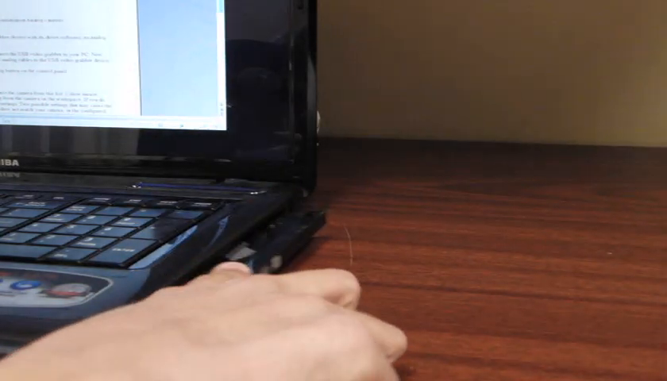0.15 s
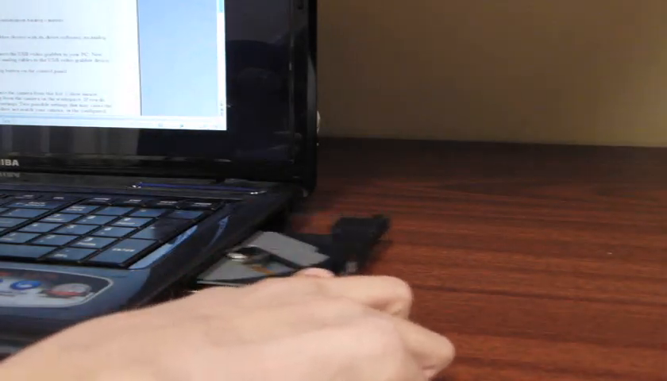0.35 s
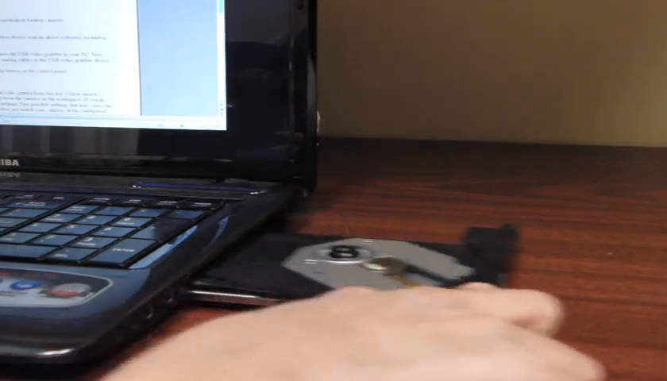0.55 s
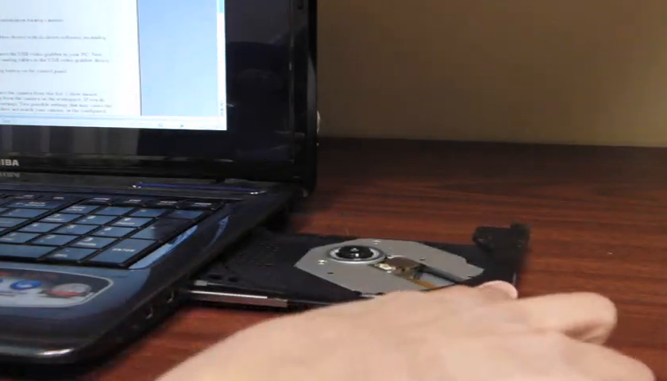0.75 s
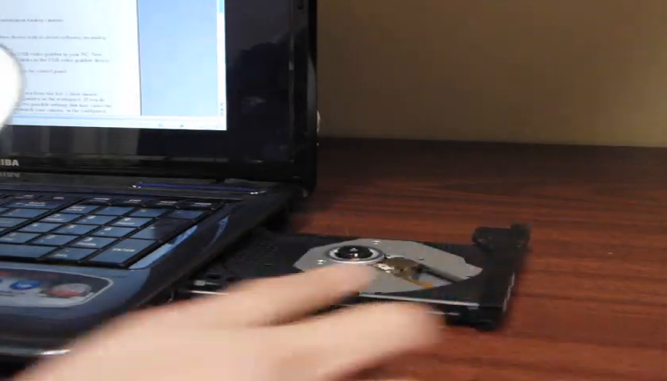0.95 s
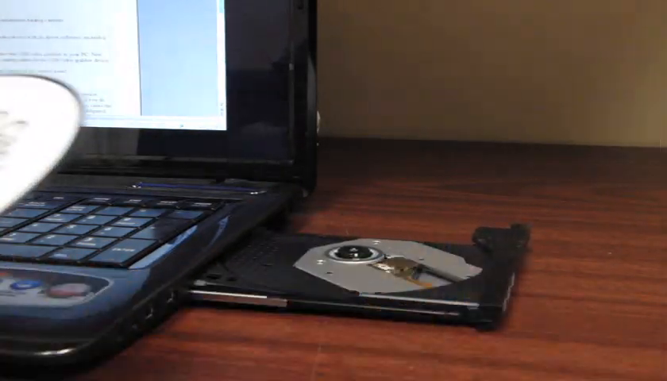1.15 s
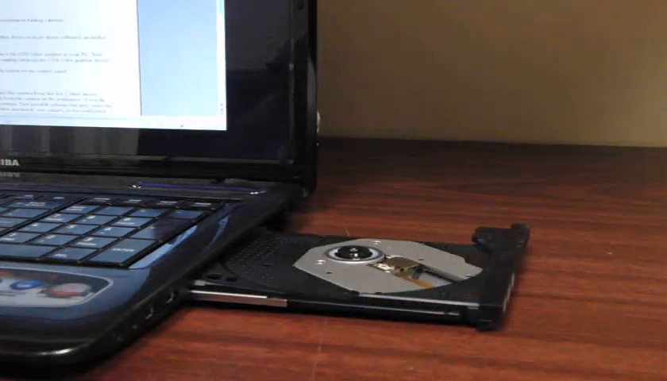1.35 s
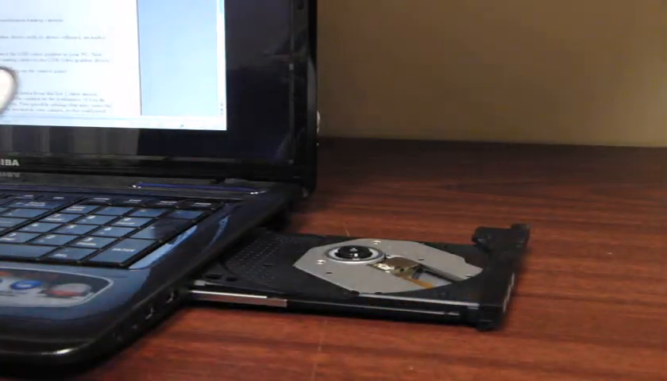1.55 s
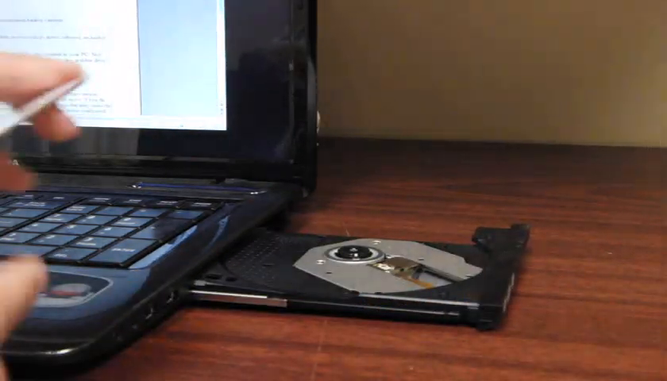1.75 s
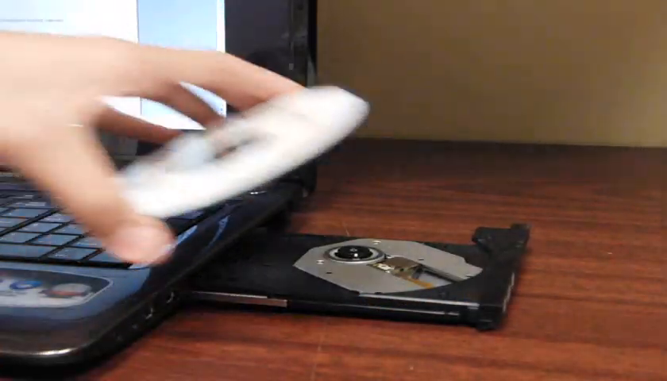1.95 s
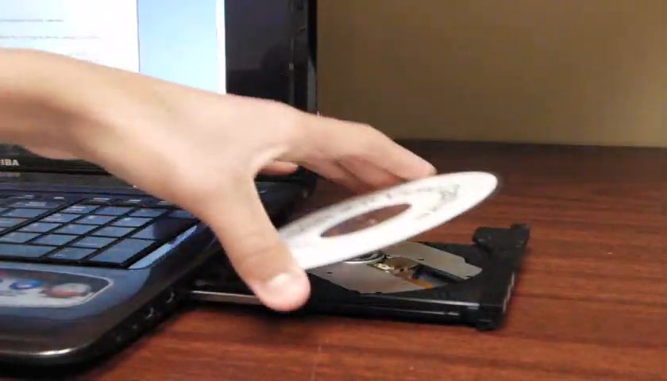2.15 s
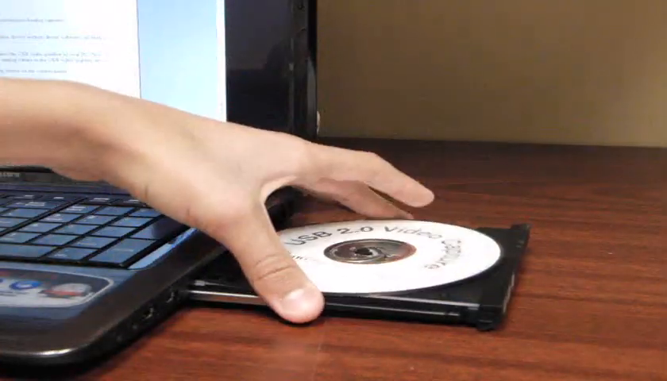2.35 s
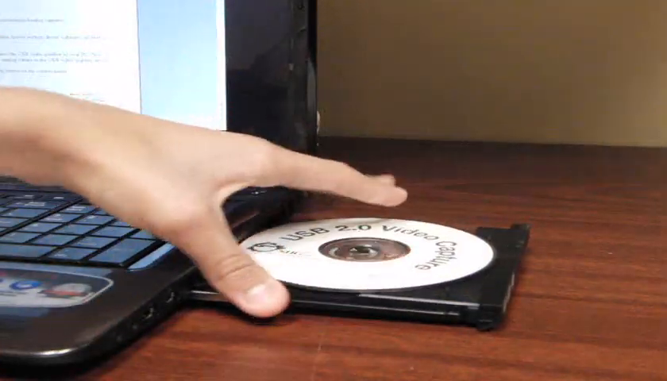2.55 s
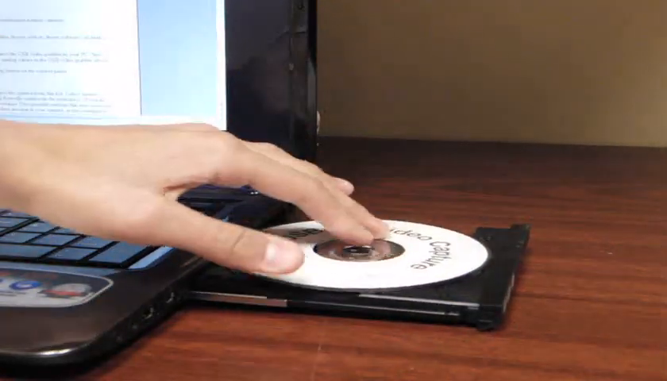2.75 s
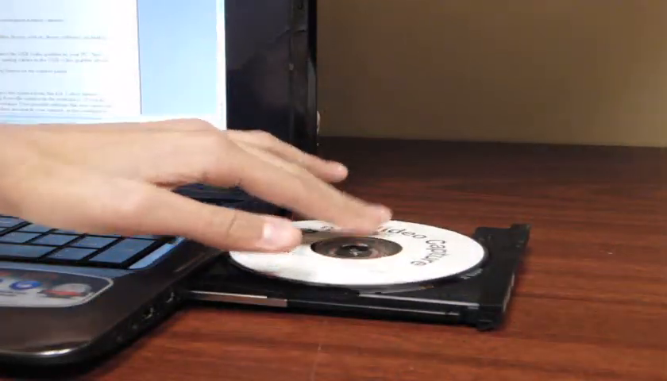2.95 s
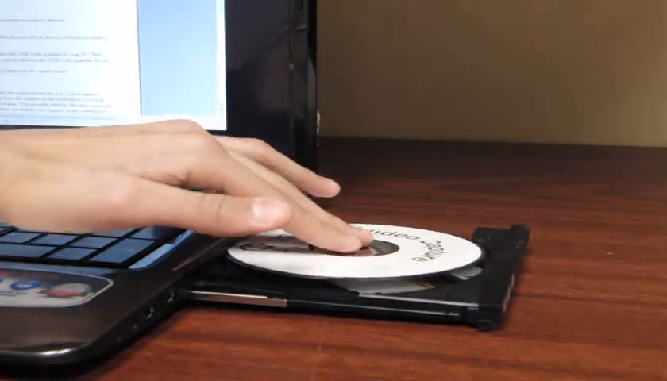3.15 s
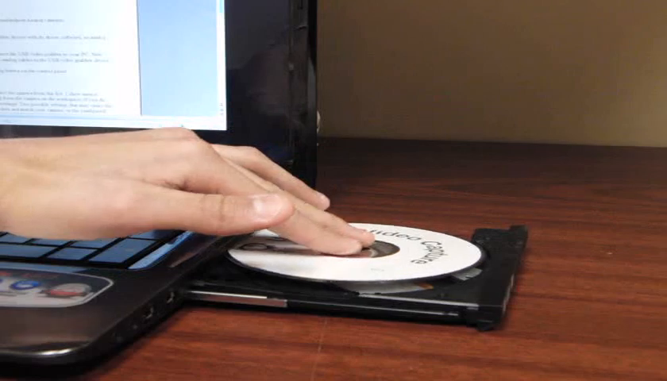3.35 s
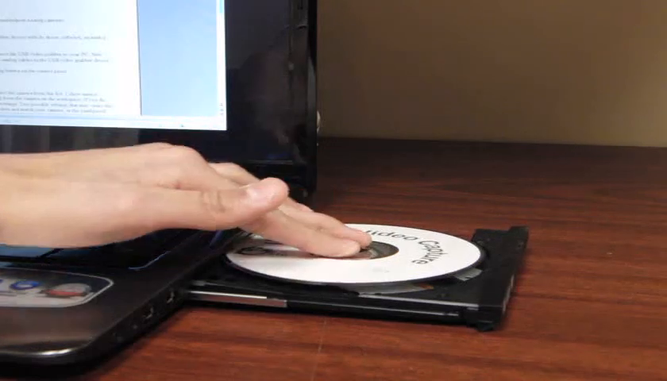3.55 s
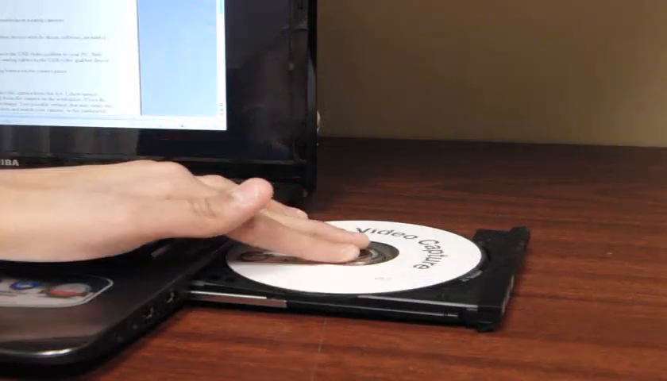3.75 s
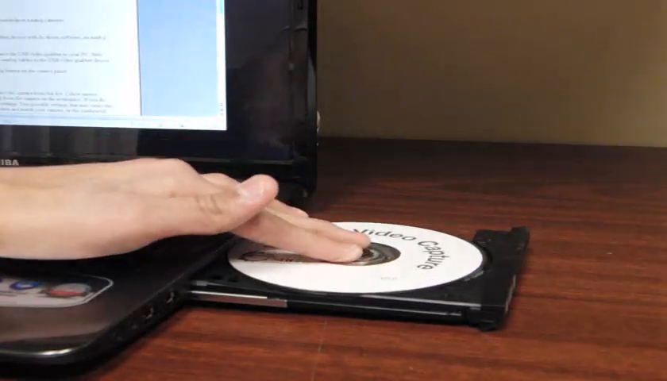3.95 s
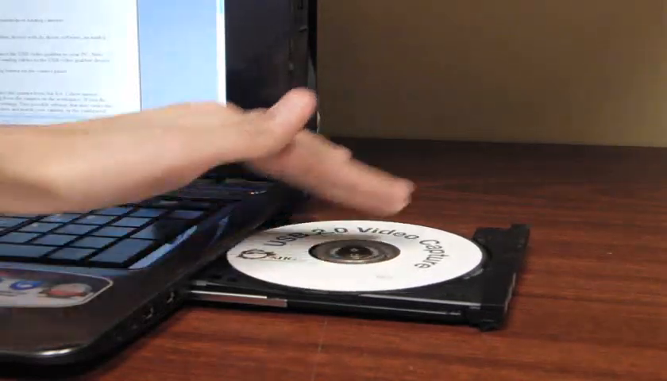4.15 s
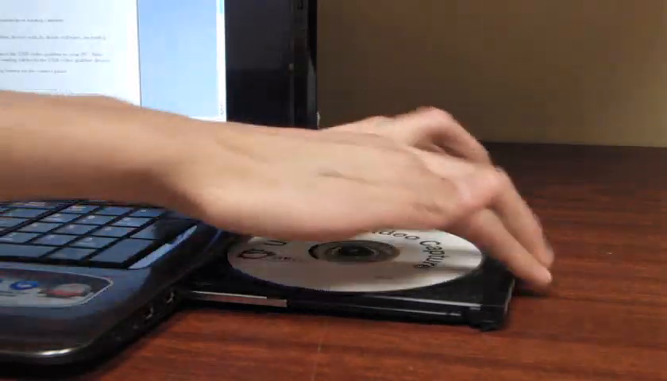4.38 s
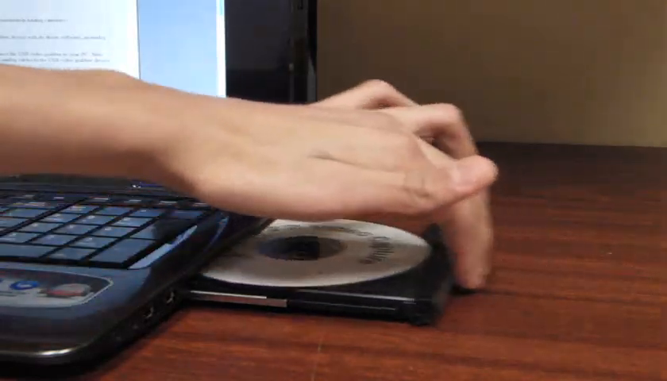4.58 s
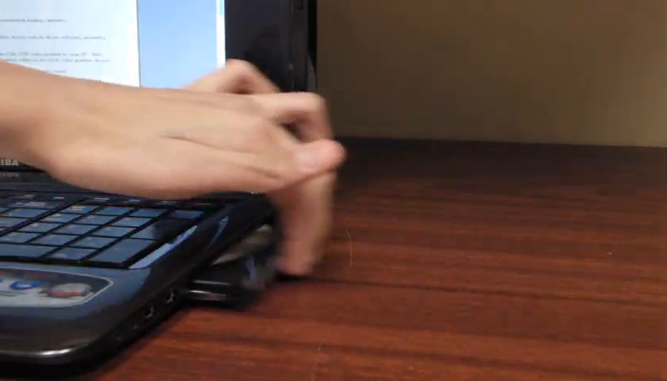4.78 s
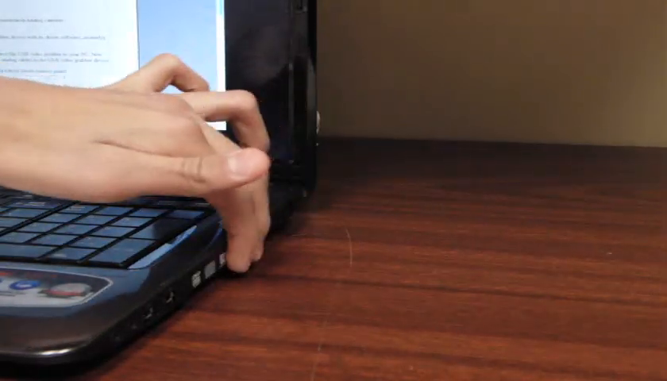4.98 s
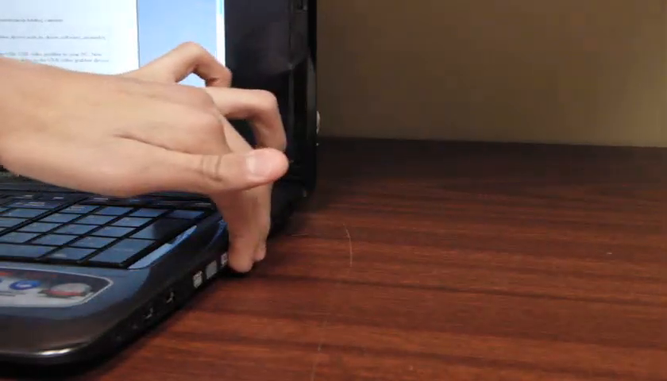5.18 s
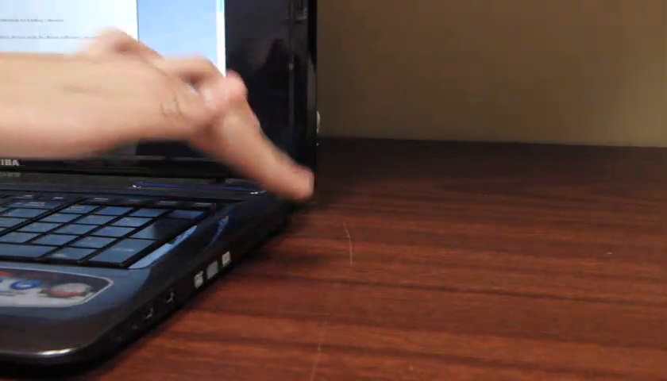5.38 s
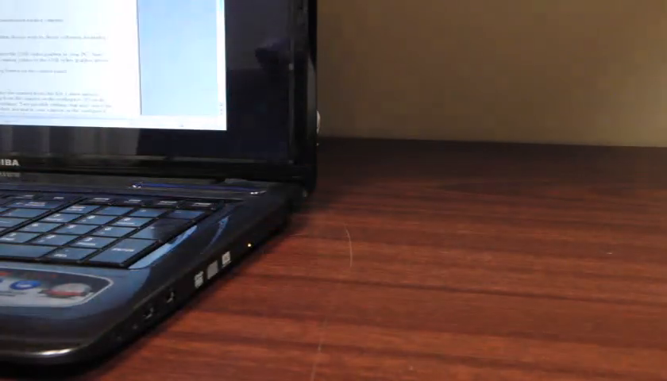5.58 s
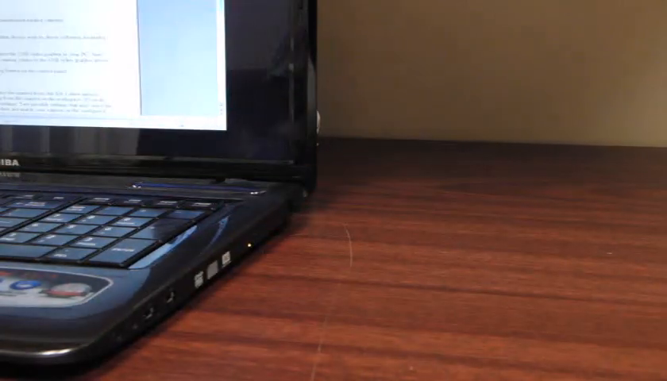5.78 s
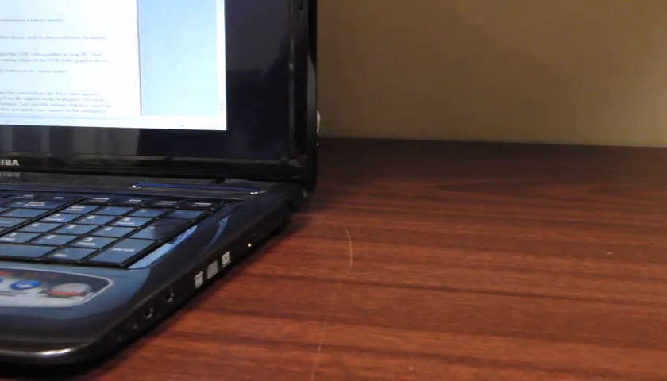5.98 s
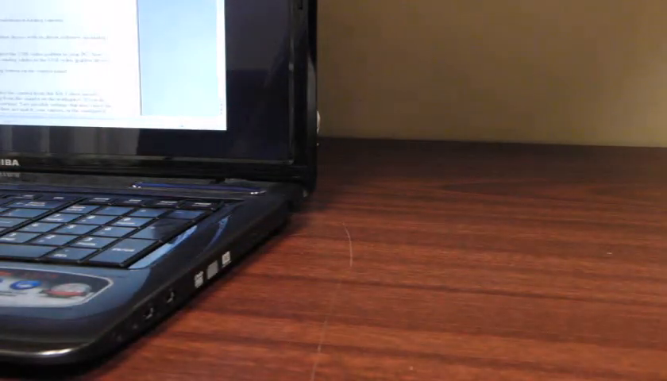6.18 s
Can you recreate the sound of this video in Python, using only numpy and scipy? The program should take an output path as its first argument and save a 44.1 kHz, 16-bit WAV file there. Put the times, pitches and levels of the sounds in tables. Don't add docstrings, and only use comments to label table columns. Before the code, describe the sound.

Close up in a small room, a laptop's thin plastic disc tray slides and clacks open. After a quiet gap of fan hiss and faint whine, a disc lands with light ticks, scrapes and rocks, then snaps sharply onto the hub. Soft hand thuds on the wooden desk follow, the tray slides in, slams and latches with crisp clicks, and a low knock ends it.

```python
import sys
import numpy as np
from scipy import signal
from scipy.fft import rfft, irfft
from scipy.io import wavfile
from scipy.ndimage import uniform_filter1d

SR = 44100
rng = np.random.default_rng(int(sys.argv[2]) if len(sys.argv) > 2 else 0)


def master_out(mix):
    frames = np.transpose(np.atleast_2d(mix))
    ceiling = np.clip(frames, -1, 1)
    pcm = np.round(ceiling * 32767).astype(np.int16)
    wavfile.write(sys.argv[1], SR, pcm)


def attenuation_scalar(level_db):
    decades = np.asarray(level_db, float) / 20
    return 10 ** decades


N = 274302

# f/Hz, density/dB
FAN_HISS = [(12, 12.5), (30, 1.5), (60, -8.5), (90, -1.5), (200, 1), (500, 1), (1000, -1), (2000, -4.5),
            (3500, -7), (5300, -11), (7000, -5.5), (8500, -9.5), (10200, -11.5), (12500, -12.5)]
# f/Hz, width/Hz, rms level/dB
WHINES = [(53, 4, -71), (876.5, 49, -70), (1240, 8, -89), (1404, 6.4, -77), (4650, 180, -70.5),
          (4780, 63, -69.5), (9620, 670, -65.5), (9800, 120, -100), (12000, 240, -74.5)]
# multiple of the pitch, rms level/dB
COIL_PARTIALS = [(1, -69), (2, -63.5)]

# t/s, peak level/dB, f/Hz, t60/s
WRIST_THUDS = [(0.222, -47, 284, 0.29), (2.661, -45, 169, 0.42), (2.719, -55, 122, 0.53),
               (3.897, -37, 225, 0.19), (3.941, -41, 235, 0.15), (3.975, -41.5, 165, 0.23),
               (4.029, -44.5, 215.4, 0.36), (4.329, -49, 532, 0.23), (4.372, -41, 289, 0.19),
               (4.398, -38.5, 252, 0.26), (4.438, -49, 175, 0.6), (4.499, -47.5, 370, 0.24),
               (4.671, -49.5, 300, 0.13), (5.12, -56, 236, 0.36)]
# t/s, peak level/dB, f/Hz, t60/s
LAST_KNOCK = [
    (5.891, -38, 803, 0.048),
    (5.892, -29.5, 500, 0.06),
    (5.906, -35.5, 351, 0.2),
    (5.997, -49.5, 360, 0.086),
]
# t/s, peak level/dB, f/Hz
DESK_BLOWS = [
    (0.692, -54, 101),
    (2.431, -58, 125),
    (3.76, -50.5, 86),
    (4.819, -61, 149),
    (4.938, -58, 112),
    (5.894, -49.5, 125),
]
# start t/s, stop t/s, start level/dB, stop level/dB, low body share/dB
SLIDE_STROKES = [(.23, 0.42, -59, -54.5, -4), (0.413, 0.575, -58.5, -47, -4),
                 (0.574, 0.629, -40.5, -39, -0.5), (0.643, 0.682, -43, -36.5, 2),
                 (1.081, 1.2, -51.5, -69, -5.5), (2.315, 2.37, -56, -54, -12), (2.597, 2.732, -55, -66, 4),
                 (3.102, 3.29, -48.5, -68, 3.5), (3.9, 4.05, -59, -73, 4), (4.522, 4.663, -56, -57, -5),
                 (4.657, 4.805, -53.5, -42, -7.5)]

# t/s, peak level/dB, heft (low body) level/dB, bright level/dB, rattle length/s
TRAY_OUT = [(.245, -47.5, -17, -14, 0.021), (.389, -44.5, -13, -2, 0.0079), (.6185, -10, -18, -7, 0.015),
            (.6232, -12.5, -24.5, 2, 0.0077), (.6822, -9, -16, -3, 0.0095), (.6845, -13, -2, 1.5, 0.0047),
            (.695, -30, -4, 8, .01), (.855, -43, -6.5, -2, 0.0071), (.8685, -33, -8, -6.5, 0.014),
            (1.074, -40.5, -28, -3, .003), (1.108, -52, -11, 9, .009), (1.358, -47, -8, -2, .007)]
# t/s, peak level/dB, heft level/dB, bright level/dB
DISC_LAID = [
    (2.3235, -41.5, -10, -10),
    (2.3474, -42, -24, -6),
    (2.4157, -23, -14.5, 2),
    (2.4294, -31.5, -4, -2),
    (2.4494, -35, -18, 0),
    (2.574, -36.5, -12, 5.5),
    (2.622, -34, -16, -3.5),
    (2.6691, -48, -2, -17),
]
# t/s, peak level/dB, heft level/dB, bright level/dB
HUB_SCRAPES = [
    (2.64, -39, -13, -12),
    (2.66, -37.5, -15, -12),
    (2.685, -47.5, -10, -15),
    (2.71, -50, -10, -15),
]
# t/s, peak level/dB, heft level/dB, bright level/dB
DISC_SETTLES = [(2.81, -45.5, -11, -1), (2.84, -47.5, -10, 0), (2.8921, -43.5, 0, 3),
                (2.951, -48.5, 3.5, -1), (3.0364, -42.5, -0.5, -5), (3.0975, -35.5, -9.5, 2.5),
                (3.135, -41.5, 0, 2), (3.1644, -37, -5, 0), (3.1894, -54, 3, -12), (3.2475, -43, 0, -3),
                (3.31, -49, -2, -4), (3.4364, -57, 6.5, 7), (3.5374, -33.5, -7.5, -1.5)]
# t/s, peak level/dB, heft level/dB, bright level/dB, rattle length/s
DISC_PRESSED = [(3.7635, -25, -9.5, 12.2, 0.013), (3.7704, -29, -2, 10, .004),
                (3.7772, -12, -22.5, 2.2, .004), (3.7825, -26, -1, 10.5, 0.0032),
                (3.7864, -24.5, -5, 6.7, 0.017), (3.9085, -41.5, 0, 7.4, 0.0024),
                (3.919, -39, -3, 4.9, 0.0023), (3.926, -37.5, -24, 16, .002),
                (3.9415, -41.5, -15, 12.3, 0.0032), (3.9522, -47, -5, 20, 0.0026),
                (4.196, -48.5, -24, 8, .004)]
# t/s, peak level/dB, heft level/dB, bright level/dB, rattle length/s
TRAY_IN = [
    (4.4883, -32.5, 0.5, 6, 0.015),
    (4.5227, -43.5, -18, 14, 0.0048),
    (4.5744, -49, -5, -6, 0.0046),
    (4.6927, -38, -17, 0, 0.0046),
    (4.8082, -8, -21.5, 2.5, 0.0074),
    (4.828, -11.5, -15, 3.5, 0.0046),
    (4.8524, -49, -18, -2, .011),
]
# t/s, peak level/dB, heft level/dB, bright level/dB, rattle length/s
LATCH = [
    (4.9217, -10, -31, 3.5, 0.014),
    (4.939, -8, -22, 3, 0.0027),
    (4.9511, -14.5, -14, 3, .01),
]
# t/s, peak level/dB, heft level/dB, bright level/dB, rattle length/s
LET_GO = [
    (5.0708, -39.5, -11, -10, 0.0029),
    (5.3066, -33, -9, 1.5, 0.0088),
    (5.8413, -44, -21, 4, .003),
]

# f/Hz, level/dB, t60/s
LOW_BODY = [(407, -6.5, 0.024), (513, -7, 0.01), (719, 0.5, 0.022), (815, -3.5, 0.024), (1037, 0, 0.017),
            (1259, -4, 0.019)]
MID_BODY = [(1455, -2.5, 0.019), (1670, 4.5, 0.024), (1796, 2, 0.0077), (2004, 4, 0.014), (2216, 2, 0.0069),
            (2308, 6, 0.022), (2568, 0.5, 0.013)]
UPPER_BODY = [(3022, 1, 0.0022), (3310, 6.5, 0.0023), (3520, 8, 0.015), (3754, -0.5, 0.0031),
              (4178, 4.5, 0.0034), (4353, 5, 0.0072), (4490, -3, 0.012), (5204, -7.5, 0.0058)]
BRIGHT_BODY = [(6000, -4, 0.0047), (6510, 5, 0.018), (6740, 6.5, 0.0036), (6984, 5.5, 0.014),
               (7700, -1.5, 0.0085), (8380, -8.5, 0.0033), (8780, -11.5, 0.0084), (10200, -36, 0.001),
               (12600, -37, 0.0017)]
# f/Hz, level/dB, t60/s
DISC_BODY = [(620, -8.5, 0.011), (907, 3, 0.052), (1200, -12, 0.012)]
# f/Hz, level/dB, t60/s
HUB_BODY = [(2990, -10.5, 0.006), (3290, 5.5, 0.012), (3400, 6, .008), (3880, -3.5, 0.0036),
            (4260, -5, 0.004), (5400, -6, 0.0046)]
HUB_EDGE = [(10600, -25.5, .002), (11640, -24, 0.0018)]
# f/Hz, level/dB, t60/s
LATCH_EDGE = [(8610, -2.5, 0.0039), (8830, -1.5, .005), (8940, -5, .004)]

# f/Hz, width/Hz, depth/dB
MIC_DIPS = [(2695, 620, -18), (4992, 420, -18), (5690, 620, -15), (7825, 900, -17)]

FAN_DB = -55
COIL_HZ, COIL_JITTER = 2410, 0.00406
DESK_T60_S = 0.11
DISC_RATTLE_S = .019
MID_DB, MID_FOLLOWS_HEFT = 2.15, 0.52
ROOM_T60_S, ROOM_DB, WALL_CUT_HZ = 0.33, -13.5, 5000
MIC_CUTOFF_HZ = 12350


def rms_one(x):
    return x / np.sqrt(np.mean(x ** 2) + 1e-20)


def add(out, s, piece):
    i = round(s * SR)
    out[i:i + len(piece)] += piece[:N - i]


def grains(size, spread_db):
    return attenuation_scalar(spread_db * np.minimum(rng.exponential(1, size), 4)) * rng.standard_normal(size)


def ring(x, hz, t60):
    r, w = attenuation_scalar(-60 / (max(t60, .002) * SR)), 2 * np.pi * hz / SR
    return signal.lfilter((1 - r * r) / 2 * np.array([1, 0, -1]), [1, -2 * r * np.cos(w), r * r], x + 1e-18)


def body(x, modes, luck_db):
    luck = rng.normal(0, luck_db, len(modes))
    longest_cycles = 28
    rung = 0
    for k, (hz, db, t60) in enumerate(modes):
        if hz > 1000:
            t60 = min(t60, longest_cycles / hz)
        rung = rung + (-1) ** k * attenuation_scalar(db + luck[k]) * ring(x, hz, t60)
    no_bass = signal.butter(2, 0.44 * modes[0][0], "high", fs=SR, output="sos")
    return signal.sosfilt(no_bass, rung)


def fan():
    hz = np.maximum(np.fft.rfftfreq(N, 1 / SR), 1)
    hiss_hz, hiss_db = np.transpose(FAN_HISS)
    colour = attenuation_scalar(np.interp(np.log(hz), np.log(hiss_hz), hiss_db))
    out = attenuation_scalar(FAN_DB) * rms_one(irfft(rfft(rng.standard_normal(N)) * colour, N))
    for centre_hz, width_hz, db in WHINES:
        peak = 1 / (1 + (2 * (hz - centre_hz) / width_hz) ** 2)
        out += attenuation_scalar(db) * rms_one(irfft(rfft(rng.standard_normal(N)) * peak, N))
    return out


def coil():
    jitter = rms_one(uniform_filter1d(rng.standard_normal(N), size=600))
    phase = 2 * np.pi * np.cumsum(COIL_HZ * (1 + COIL_JITTER * jitter)) / SR
    return sum(attenuation_scalar(db) * np.sqrt(2) * np.sin(k * phase) for k, db in COIL_PARTIALS)


def thuds():
    out, t = np.zeros(N), np.arange(SR // 3) / SR
    blows = [(*row, DESK_T60_S) for row in DESK_BLOWS]
    for s, peak_db, hz, t60 in WRIST_THUDS + LAST_KNOCK + blows:
        strength = np.exp(-t / 0.00054) + 0.58 * attenuation_scalar(-60 * t / max(t60, .02))
        push = rng.standard_normal(len(t)) * strength
        modes = [(0.597 * hz, -8, 0.53 * t60), (0.802 * hz, -5, 0.51 * t60), (hz, 0, 0.52 * t60),
                 (1.27 * hz, -8, 0.36 * t60), (2.2 * hz, -16, .02)]
        rung = body(push, modes, luck_db=1.5)
        rung = signal.sosfilt(signal.butter(2, 4.0 * hz, fs=SR, output="sos"), rung)
        add(out, s - .002, attenuation_scalar(peak_db) * rung / np.abs(rung).max())
    return out


def slides():
    t, rub = np.arange(N) / SR, grains(N, spread_db=6.0)
    low = rms_one(body(rub, LOW_BODY + MID_BODY, luck_db=0))
    high = rms_one(body(rub, UPPER_BODY + BRIGHT_BODY, luck_db=0))
    out = np.zeros(N)
    for start, stop, from_db, to_db, low_db in SLIDE_STROKES:
        fade = np.clip(np.minimum(t - start, stop - t) / 0.011, 0, 1)
        level = attenuation_scalar(np.interp(t, [start, stop], [from_db, to_db]))
        out += fade * level * (high + attenuation_scalar(low_db) * low)
    return out


def contacts(table, low_modes, upper_modes, bright_modes):
    out, t = np.zeros(N), np.arange(SR // 8) / SR
    buzz = attenuation_scalar(-8.5 - 60 * t / 0.076)
    for s, peak_db, low_db, bright_db, length in table:
        mid_db = MID_DB + MID_FOLLOWS_HEFT * low_db
        clicks = grains(len(t), spread_db=4.5)
        clicks *= 1 + 2.9 * np.exp(-t / 0.00028)
        families = ((low_modes, low_db, 2.2), (MID_BODY, mid_db, 1.5),
                    (upper_modes, 0, 1), (bright_modes, bright_db, 1.1))
        for modes, db, slower in families:
            onset = np.minimum(t / (.0005 * slower ** 2), 1)
            rattle = attenuation_scalar(-25 * (t / (slower * max(length, .001))) ** 2)
            rung = body(clicks * onset * (rattle + buzz), modes, luck_db=1.5)
            add(out, s - .0005, attenuation_scalar(peak_db + db) * rung / np.abs(rung).max())
    return out


def room(x):
    t = np.arange(SR // 2) / SR
    noise = rng.standard_normal((2, len(t)))
    dull = signal.sosfilt(signal.butter(1, WALL_CUT_HZ, fs=SR, output="sos"), noise[0])
    late = dull * attenuation_scalar(-60 * t / ROOM_T60_S)
    early = 1.54 * noise[1] * attenuation_scalar(-60 * t / (0.1 * ROOM_T60_S))
    tail = (late + early) * np.minimum(t / 0.011, 1)
    return signal.fftconvolve(x, tail / np.sqrt(np.sum(tail ** 2)))[:N]


def loose_disc(table):
    return [(*row, DISC_RATTLE_S) for row in table]


def scene():
    tray_and_disc = TRAY_OUT + loose_disc(DISC_LAID) + TRAY_IN + LET_GO
    near = slides()
    near += contacts(tray_and_disc, LOW_BODY, UPPER_BODY, BRIGHT_BODY)
    near += contacts(loose_disc(HUB_SCRAPES) + DISC_PRESSED, LOW_BODY, HUB_BODY, BRIGHT_BODY + HUB_EDGE)
    near += contacts(loose_disc(DISC_SETTLES), DISC_BODY, UPPER_BODY, BRIGHT_BODY)
    near += contacts(LATCH, LOW_BODY, UPPER_BODY, BRIGHT_BODY + LATCH_EDGE)
    mono = near + attenuation_scalar(ROOM_DB) * room(near) + thuds() + fan() + coil()
    return np.array([mono, mono])


def top_cut(x):
    return signal.sosfilt(signal.butter(12, 13370, fs=SR, output="sos"), x)


def record(dry):
    flutter = uniform_filter1d(rng.standard_normal(N), size=40) * np.sqrt(40)
    treble = signal.butter(4, 6500, "high", fs=SR, output="sos")
    trace = signal.sosfilt(treble, 2.0 * dry[0] * flutter)
    thin_band = signal.butter(4, [11000, 12300], "band", fs=SR, output="sos")
    hiss = signal.sosfilt(thin_band, rng.standard_normal(N))
    hiss *= np.repeat(rng.random(N // 2048 + 1) < .7, 2048)[:N]
    x = dry + (attenuation_scalar(-40) * trace + attenuation_scalar(-78) * hiss) * [[1], [-1]]
    for hz, width_hz, depth_db in MIC_DIPS:
        w, a = 2 * np.pi * hz / SR, np.pi * width_hz / SR
        left_over = a * attenuation_scalar(depth_db)
        x = signal.lfilter([1 + left_over, -2 * np.cos(w), 1 - left_over], [1 + a, -2 * np.cos(w), 1 - a], x)
    x = signal.sosfilt(signal.ellip(8, 1, 50, MIC_CUTOFF_HZ, fs=SR, output="sos"), x)
    return top_cut(x)


dry = scene()
out = record(dry)
master_out(out)
```